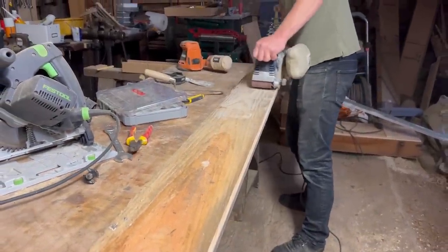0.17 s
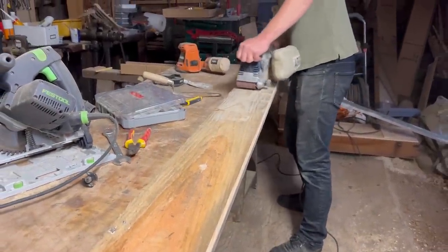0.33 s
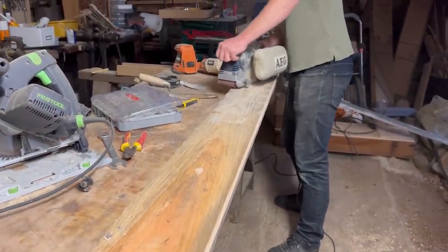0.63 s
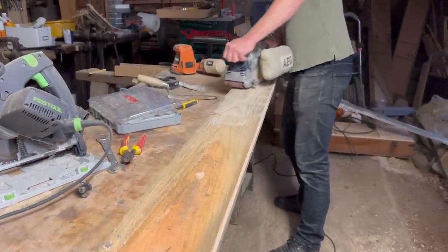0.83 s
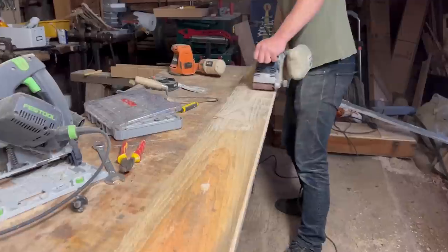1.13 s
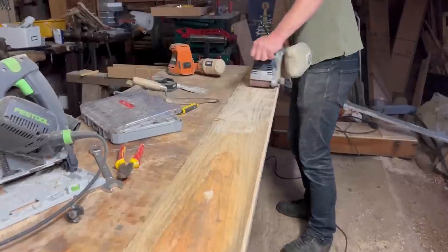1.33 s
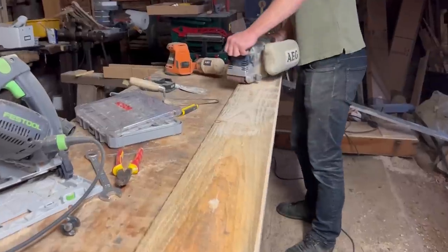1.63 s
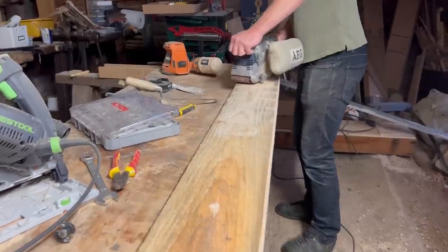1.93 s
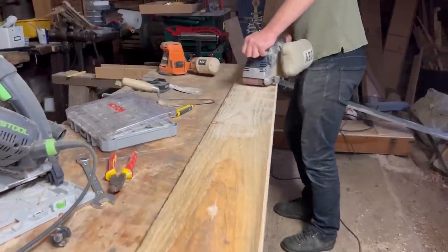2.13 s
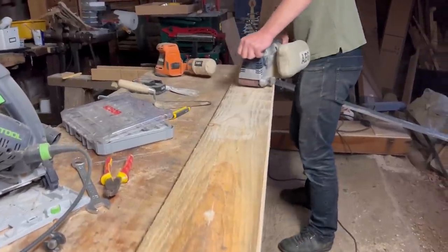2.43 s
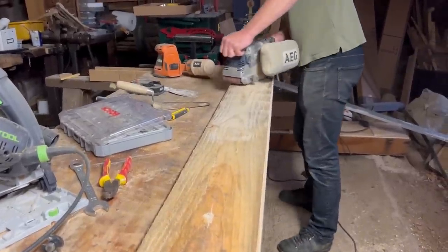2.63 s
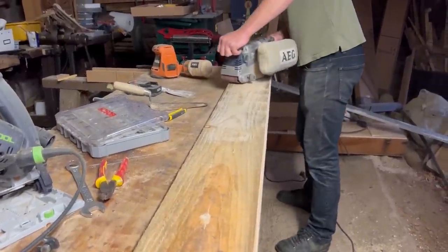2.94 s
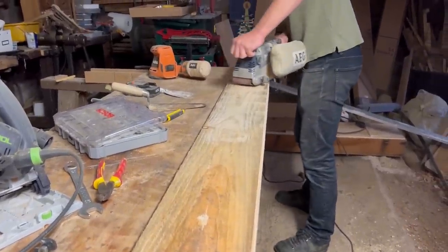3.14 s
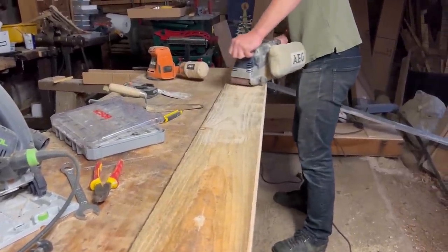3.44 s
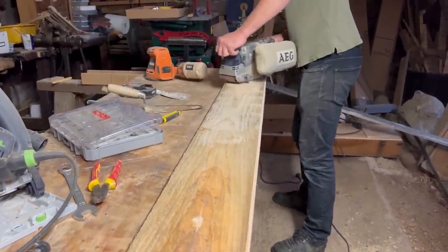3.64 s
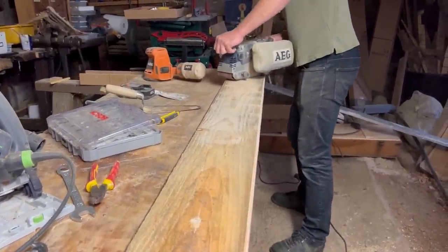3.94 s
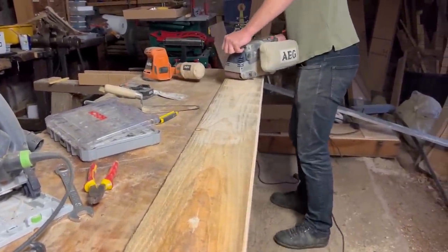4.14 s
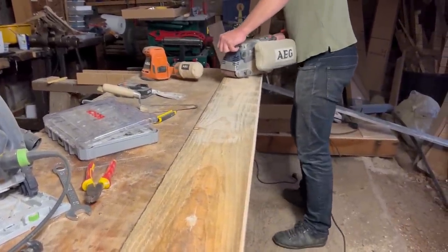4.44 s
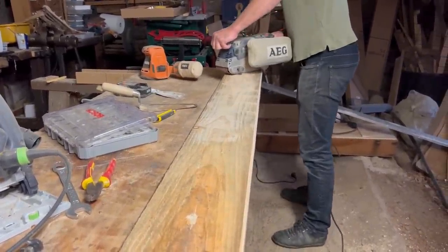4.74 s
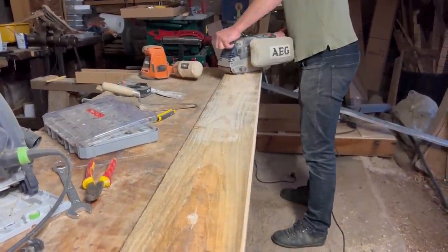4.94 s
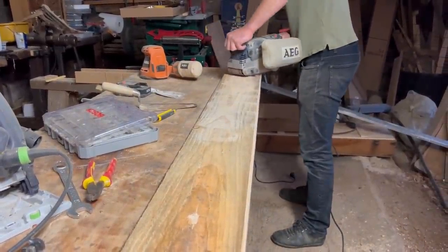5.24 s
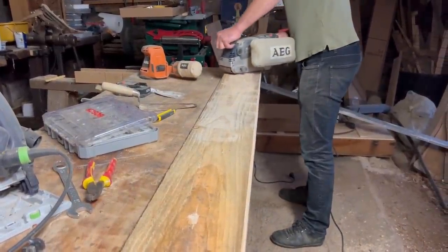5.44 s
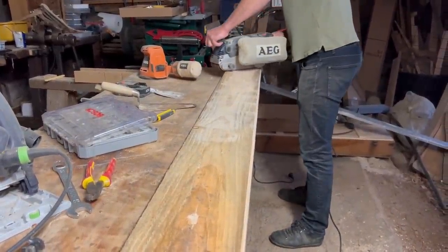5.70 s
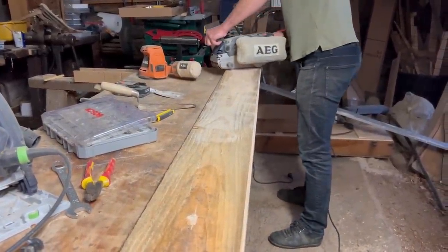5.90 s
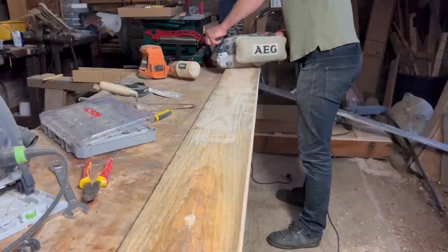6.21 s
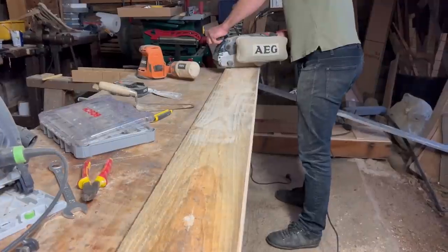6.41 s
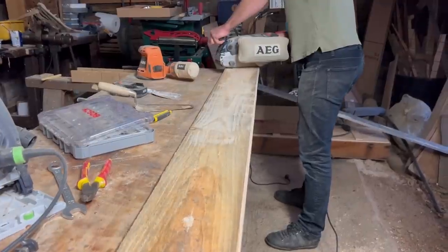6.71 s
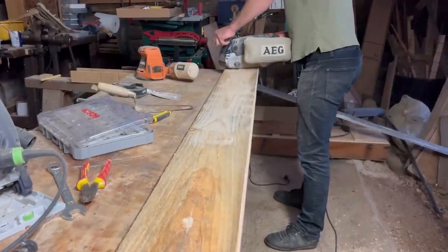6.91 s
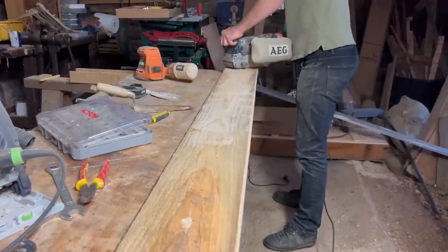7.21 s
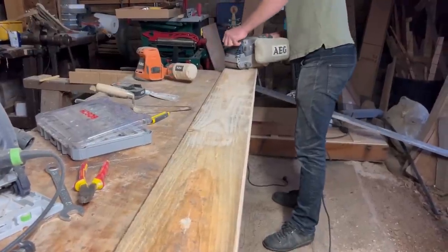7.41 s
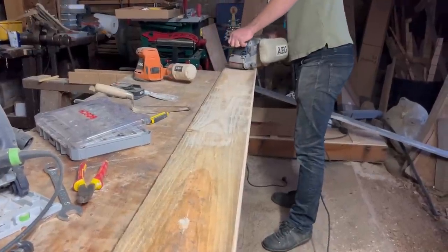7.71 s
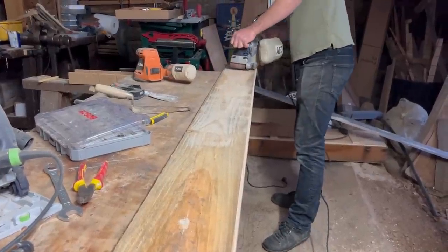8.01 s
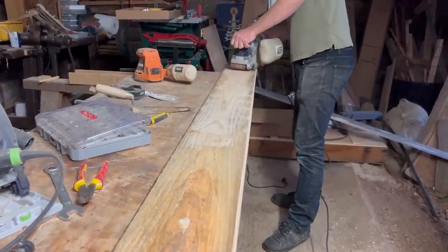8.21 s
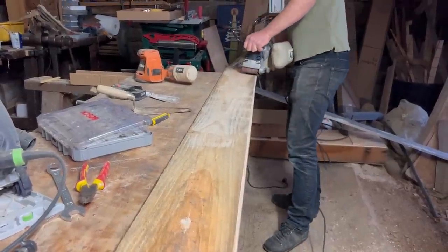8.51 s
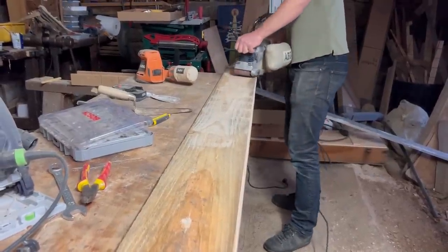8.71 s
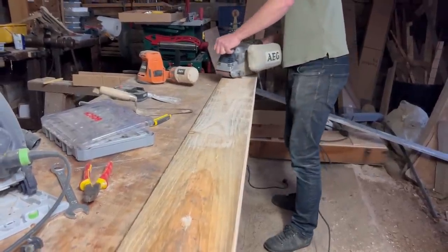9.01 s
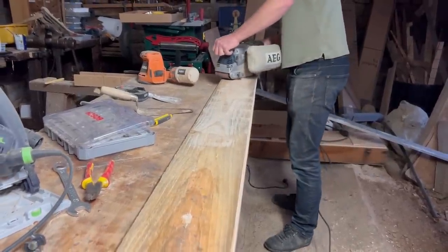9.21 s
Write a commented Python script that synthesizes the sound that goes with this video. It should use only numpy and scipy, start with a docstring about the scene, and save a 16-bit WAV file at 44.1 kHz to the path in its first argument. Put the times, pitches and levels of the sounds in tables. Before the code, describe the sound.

A belt sander whines loudly and steadily over a wooden board, gritty hiss and soft rapid belt thumps beneath, the whine wavering, thinning and returning.

```python
"""A belt sander works to and fro over a long wooden board in a workshop, heard on two microphones for 9.35 s.
It opens with a strong whine on a multiple of the shaft speed, over grit hissing on wood and a soft thump per belt lap.
The whine thins near 2.3 s, returns, thins from 4.2 to 5.5 s, swells around 6 s and nearly goes by 7.5 s;
it climbs in pitch to about 8.6 s, then eases down. All along, echoes cancel it briefly, often on one side only,
while noise bands swell and fade for the hiss, and summed cosines of the lap rate make the board boom."""
import sys
import numpy as np
from scipy import signal
from scipy.fft import rfft, irfft, next_fast_len
from scipy.io import wavfile
from scipy.ndimage import uniform_filter1d

SR = 44100
rng = np.random.default_rng(int(sys.argv[2]) if len(sys.argv) > 2 else 0)


def generate_wav(sig):
    """Save sig (samples, or channels by samples) to the path in sys.argv[1] as 16-bit PCM at SR."""
    pcm = np.round(np.clip(np.atleast_2d(sig).T, -1, 1) * 32767).astype(np.int16)
    wavfile.write(sys.argv[1], SR, pcm)


N = 412335

# Motor speed under load, as the pitch of the main whine before inertia rounds it: start_s, pitch_hz
SPEED = [(0, 1780), (.36, 1755), (.63, 1800), (.84, 1791), (1.0, 1828), (1.17, 1801), (1.42, 1827),
         (1.9, 1799), (2.22, 1864), (2.45, 1860), (2.65, 1830), (3.03, 1808), (3.22, 1846), (3.5, 1826),
         (3.62, 1837), (4.05, 1810), (4.23, 1800), (4.9, 1807), (5.1, 1832), (5.5, 1816), (6.26, 1795),
         (6.6, 1810), (7.2, 1840), (7.32, 1827), (7.55, 1831), (8.09, 1895), (8.35, 1905), (8.62, 1920),
         (8.76, 1913), (9.08, 1861), (9.35, 1886)]
# Slow level of the main whine as the sander travels and turns: start_s, left_db, right_db
WHINE_LEVEL = [(0, -15.5, -17), (.36, -14, -15.5), (.63, -17, -23.5), (.86, -19.5, -21.5),
               (1.19, -18, -11.5), (1.46, -21.5, -18), (1.7, -15.5, -21), (1.97, -17.5, -27),
               (2.2, -30, -25), (2.48, -29, -22.5), (2.72, -18.5, -24), (3.3, -17.5, -20.5),
               (3.9, -19, -27), (4.25, -26.5, -26.5), (4.5, -28.5, -28.5), (4.82, -30, -23),
               (5.05, -25, -28), (5.45, -24.5, -28), (5.62, -18, -17.5), (5.9, -16, -19.5),
               (6.4, -16.5, -17), (6.95, -28.5, -26.5), (7.3, -33, -28), (7.7, -33, -28.5), (8.1, -23, -32),
               (8.45, -26, -29), (8.7, -25.5, -25), (9.05, -22, -22.5), (9.35, -21, -21.5)]
# Echoes cancel or lift the whine, and the sides slip in phase:
# centre_s, left_change_db, right_change_db, half_width_s, left_slip_cycles
DROPOUTS = [(.2, 0.5, 0, 0.14, 0.18), (.99, -6, -0.5, 0.067, -0.025), (1.51, -17, 1, 0.023, 0.082),
            (1.56, -2.5, -25, 0.049, -0.061), (1.8, -0.5, -11, 0.033, -0.071),
            (2.07, -8, -11, 0.042, -0.22), (2.18, -10, 1, 0.015, 0.19), (2.36, -3, -9, 0.031, 0.042),
            (2.592, -17, -11, 0.055, 0.25), (3.15, -11, -11, 0.055, 0.68), (3.612, -6.5, -9, 0.2, 0.27),
            (4.115, -25, -5, 0.031, -.165), (4.62, -4, -5, 0.055, 0.15), (4.95, -16, -1, 0.037, 0.17),
            (5.09, 3.5, -9, 0.059, -0.42), (5.36, -2.5, -17, 0.038, -0.61), (5.7, -11, -3.5, 0.082, -0.31),
            (6.89, 1.5, -5, .05, -.15), (7.04, 0, 5, .05, 0.22), (7.24, -9, -1, 0.048, .75),
            (7.48, 4, 1, .05, .12), (7.63, -4, -1, 0.065, -0.633), (7.92, -0.5, -8, .04, .27),
            (8.36, -1, 2, .07, .45), (8.56, -4, -19, .055, 0), (8.783, -16, -12, 0.039, -0.99),
            (9.152, 0, -14, 0.043, -.1), (9.258, -8, -0.5, .025, 0.17)]
# Other lines of the motor: shaft_multiple, left_over_right_db, left_lead_cycles
OVERTONE_LINES = [(2, -1.5, .1), (12, 9, -.18), (14, 3.5, 0), (18, 13, -.15)]
# Their slow peak levels at the left microphone: start_s, then level_db of each line in that order
OVERTONE_LEVEL = [(0, -46, -38, -42, -33), (.3, -46, -35, -34, -33), (.55, -52, -38, -33, -44),
                  (.8, -50, -38, -34, -36), (1.15, -42, -39, -40, -34), (1.4, -43, -40, -37, -43),
                  (1.75, -51, -40, -37, -32), (2.0, -50, -31, -38, -33), (2.15, -47, -34, -36, -43),
                  (2.4, -45, -36, -35, -35), (2.75, -50, -33, -33, -46), (3.05, -51, -36, -34, -39),
                  (3.3, -49, -33, -33, -45), (3.7, -51, -42, -34, -45), (4.1, -49, -33, -37, -41),
                  (4.45, -52, -35, -36, -30), (4.75, -44, -36, -33, -46), (5.0, -50, -40, -33, -45),
                  (5.4, -49, -31, -33, -47), (5.65, -46, -39, -40, -37), (6.0, -44, -32, -34, -34),
                  (6.25, -44, -28, -35, -31), (6.5, -48, -35, -43, -45), (6.9, -45, -35, -41, -46),
                  (7.35, -47, -44, -36, -46), (7.65, -45, -37, -31, -32), (8.0, -48, -33, -34, -39),
                  (8.3, -56, -28, -32, -42), (8.5, -54, -35, -38, -40), (8.8, -56, -29, -33, -45),
                  (9.1, -45, -37, -31, -36), (9.35, -50, -39, -32, -46)]
# Faint motor lines, mean peak level: shaft_multiple, level_db
FAINT_TONES = [(1.485, -55), (1.555, -55), (5, -50), (7, -50)]

# Mean colour of the hiss before the resonances:
# pitch_hz, left_db_per_hz, right_db_per_hz, likeness_0_to_1, right_lead_cycles
HISS = [(30, -84, -84, .95, 0), (65.4, -84.5, -80, 0.86, -0.013), (134, -67, -70, 0.91, 0.051),
        (210, -73.5, -73.5, 0.97, -0.066), (505, -64.5, -67, 0.9, -0.087), (662, -67, -67.5, 0.72, -0.18),
        (1105, -60.5, -61.5, 0.89, -0.11), (1900, -60.5, -59.5, 0.52, -0.13),
        (2360, -60.5, -61.5, 1, -0.31), (2920, -58, -64.5, 0.37, -0.089), (3540, -60.5, -67.5, 0.3, -0.27),
        (3980, -62, -72, 0.56, 0.036), (4450, -64, -68.5, 0.6, -0.15), (4580, -64, -69.5, 0.67, -0.13),
        (5270, -59.5, -71, 0.45, 0.3), (6650, -61.5, -70, 0.3, 0.26), (7340, -68.5, -70.5, 0.5, 0.056),
        (9150, -72, -72, 0.1, 0.44), (9500, -73, -73, .75, .42), (10200, -74, -74, .92, .5),
        (10800, -74, -74, .8, .56), (11510, -71, -72, 1, 0.74), (13700, -76.5, -74.5, 1, 0.93),
        (16100, -75, -82, .5, 1.4)]
# Resonances of board and housing, added to that colour: centre_hz, width_hz, peak_db
RESONANCES = [(316.6, 24, 6), (462, 29, 5.5), (1310, 150, 1)]
# Sanding strength, of which only the swing about the mean is used:
# start_s, board_low_db, board_upper_db, grit_db
SANDING = [(0.0, -45.5, -33.5, -27.5), (0.34, -46.5, -33.5, -25.5), (0.42, -44, -34, -31.5),
           (1.53, -43.5, -35, -26), (1.66, -40.5, -34.5, -31), (2.39, -43.5, -36, -26),
           (2.86, -40.5, -36.5, -30), (3.28, -39, -35, -25.5), (3.44, -45.5, -37.5, -27.5),
           (3.83, -41, -32, -27.5), (4.37, -42.5, -35.5, -26.5), (5.23, -39.5, -34.5, -28),
           (5.28, -43.5, -38, -29.5), (5.8, -39, -33, -25), (6.72, -40, -34.5, -25.5),
           (7.11, -42.5, -38, -31.5), (7.52, -39.5, -34, -26.5), (9.35, -39, -33, -26)]
# Where one sanding layer hands over to the next: seam_hz
LAYER_SEAMS_HZ = (880, 1900, 3900, 7600)
# Layers from low to high: sanding_column (0 = board_low_db), share_of_swing (ratio)
LAYER_FOLLOWS = [(0, 0.69), (1, 0.7), (2, 0.56), (2, 0.54), (2, 0.3)]
# Grit bites harder or lighter, before each layer takes its share: centre_s, change_db, half_width_s
SCUFFS = [(.3, -1, 0.1), (.95, 2.5, 0.041), (2.1, 1, 0.031), (3.15, 5.5, 0.038), (4.8, 1.5, 0.02),
          (5.15, 2.5, 0.049), (5.75, 1.5, 0.055), (6.801, 2.5, 0.036)]
# One band of the sanding noise swells or fades, before its grain: centre_s, centre_hz, change_db, half_width_s
RASPS = [(.3, 2900, 5.5, .22), (1.25, 2760, 3.5, 0.45), (2.2, 2760, 4, 0.17), (3.75, 315.6, 4.5, 0.33),
         (3.9, 470, -4, 1.59), (4.05, 2800, 4, 0.034), (6.1, 1409, 4, 0.87), (7.0, 199, -9, 1.61),
         (8.4, 2773, 3, 0.075), (8.72, 2690, 3, 0.14)]

# The board booms as the sander crosses a free stretch: centre_s, half_width_s, low_db, middle_db, high_db
BOOMS = [(0, 0.26, -58, -46.5, -53), (.65, 0.26, -56, -49, -52), (1.27, 0.25, -51, -49.5, -49.5),
         (1.8, 0.19, -66, -51, -58), (2.34, 0.16, -42, -50, -47.5), (2.78, .15, -64, -51, -52.5),
         (3.33, 0.22, -44, -58, -44.5), (4.0, 0.21, -56, -65, -51), (4.8, 0.64, -47, -54, -79),
         (5.25, 0.17, -45, -64, -47.5), (5.7, 0.28, -52, -55, -72), (6.2, 0.26, -50, -60, -69),
         (7.198, 0.77, -48.5, -59, -54), (8.6, 0.26, -55, -49, -49.5), (9.0, 0.54, -50, -51, -71)]
# Thump lines carried by those booms: lap_multiple, boom_column (0 = low_db), added_db
BOOM_LINES = [(8, 0, -25), (9, 0, -1.5), (10, 1, -4.5), (11, 1, 0.5), (12, 1, -6), (13, 2, -14), (14, 2, 2),
              (15, 2, -4)]
# Thump lines outside the booms, mean level: lap_multiple, level_db
FAINT_THUMP = [(7, -65.5), (16, -71), (19, -68), (20, -61.5)]

MAIN_MULTIPLE = 6   # the main whine, in multiples of the shaft speed
INERTIA_S = 0.079   # the rotor rounds off changes of speed
LEAD_START = -.1   # cycles by which the left whine leads before any slip
ECHO_SHARE = .24   # scattered part of each weak line, as a ratio
RASP_OCTAVES, RASP_GRAIN_DB = .22, 0.39   # half width in octaves; unevenness per dB of swell
LAPS_PER_TURN = .03676   # belt laps per turn of the shaft
JOINT_START = 0.0803   # share of a lap already run
THUMP_WANDER_DB = 3   # spread of the faint thump lines
CUTOFF_HZ = 15720


def amp(db):
    """Gain of a level in dB."""
    return 10 ** (np.asarray(db) / 20)


def rms_one(x):
    """Scaled to rms 1."""
    return x / np.sqrt(np.mean(x ** 2) + 1e-20)


def in_time(rows):
    """Columns of a curve table, with time first, at every sample."""
    s, *columns = np.transpose(rows)
    return [np.interp(np.arange(N) / SR, s, c) for c in columns]


def drift(corner_hz):
    """Slow chance of spread 1: coarse noise twice through a one-pole low-pass."""
    r = np.exp(-80 * np.pi * corner_hz / SR)   # one draw per 40 samples
    noise = rng.standard_normal(N // 40 + 2002)
    slow = signal.lfilter([1], [1, -2 * r, r * r], noise)[2000:]   # the filter has settled
    return np.interp(np.arange(N) / 40, np.arange(len(slow)), rms_one(slow))


def sides(pan_db):
    """Left and right gain for a left-over-right difference."""
    return np.array([amp(pan_db / 2), amp(-pan_db / 2)])


def motor(turns):
    """Motor lines are sines locked to the shaft, swelling and fading at each microphone as echoes add or cancel."""
    t = np.arange(N) / SR
    torque_ripple = 0.0017 * np.sin(2 * np.pi * 100 * t)   # in turns, at twice the mains
    turns = turns + 0.00061 * drift(40) + torque_ripple
    return main_whine(turns) + weak_lines(turns)


def main_whine(turns):
    """The strongest line: both microphones share its waver, but echoes dip each side and slip its phase."""
    t = np.arange(N) / SR
    left_db, right_db = in_time(WHINE_LEVEL)
    lead = LEAD_START
    for s, left_dip_db, right_dip_db, width, slip in DROPOUTS:
        away = (t - s) / width
        depth = 1 / (1 + np.abs(away) ** 3)   # steep edges
        left_db = left_db + left_dip_db * depth
        right_db = right_db + right_dip_db * depth
        lead = lead + slip * (1 + np.tanh(away)) / 2   # the slip stays
    waver = np.sqrt(2) * amp(0.97 * drift(21))   # root 2: levels are rms
    left = amp(left_db) * np.sin(2 * np.pi * (MAIN_MULTIPLE * turns + lead / 2))
    right = amp(right_db) * np.sin(2 * np.pi * (MAIN_MULTIPLE * turns - lead / 2))
    return waver * np.array([left, right])


def weak_lines(turns):
    """Other shaft multiples: scattered echoes add or cancel, and each microphone hears its own waver."""
    lines = []
    for (k, pan_db, ahead), left_db in zip(OVERTONE_LINES, in_time(OVERTONE_LEVEL)):
        lines.append((round(k), pan_db, ahead, left_db - pan_db / 2))
    for k, db in FAINT_TONES:
        lines.append((k, 0, 0, db + 3 * drift(1.5)))
    out = np.zeros((2, N))
    for k, pan_db, ahead, db in lines:
        blur = rng.random() + .1 * drift(2.5) + .0003 * k * k * drift(15)   # cycles; high lines blur most
        scatter = 1 + ECHO_SHARE * (drift(8) + 1j * drift(8))   # direct sound plus echoes
        blur = blur + np.angle(scatter) / (2 * np.pi)
        db = db + 20 * np.log10(np.abs(scatter) + 1e-3)
        for side, gain in enumerate(sides(pan_db)):
            echo_shift = blur - side * ahead + .06 * drift(2.5)
            level = gain * amp(db + 1.2 * drift(8))
            out[side] += level * np.sin(2 * np.pi * (k * turns + echo_shift))
    return out


def hiss_spectrum(hz, size):
    """Steady grit noise, partly shared by both microphones, coloured by the board and housing."""
    at, *columns = np.transpose(HISS)
    left_db, right_db, alike, lead = [np.interp(np.log(hz), np.log(at), c) for c in columns]
    alike = np.clip(alike, 0, 1)
    peaks_db = sum(db / (1 + (2 * (hz - centre_hz) / width) ** 2) for centre_hz, width, db in RESONANCES)
    first, second = rfft(rng.standard_normal((2, size)))
    shared = alike * np.exp(2j * np.pi * lead) * first
    right = shared + np.sqrt(1 - alike ** 2) * second
    coloured = np.array([amp(left_db) * first, amp(right_db) * right])
    return coloured * amp(peaks_db) * np.sqrt(SR / 2)   # from level per Hz to noise of rms 1


def hiss(laps):
    """Grit on wood: noise in quarter-octave bands that flicker with the bite of the grit."""
    t = np.arange(N) / SR
    size = next_fast_len(N)
    hz = np.maximum(np.arange(size // 2 + 1) * SR / size, 1)
    spectrum = hiss_spectrum(hz, size)

    swings_db = [c - c.mean() for c in in_time(SANDING)]
    layers_db = [share * swings_db[round(column)] for column, share in LAYER_FOLLOWS]
    scuff_db = sum(db * np.exp(-((t - s) / width) ** 4) for s, db, width in SCUFFS)
    scuff_shares = (.1, 0.29, 0.87, 1.2, 0.077)   # low to high layer
    patchy_db = (1.0, 0.97, 0.81, 0.74, 0.091)
    shared_db = 0.24 * drift(9.0) + 0.47 * drift(15.4)
    shared_db = shared_db + .45 * np.cos(2 * np.pi * (laps - .3))   # the belt cuts unevenly round its lap

    grain = 1 + RASP_GRAIN_DB * drift(28)
    rasps = []
    for s, centre_hz, db, width in RASPS:
        rasps.append((centre_hz, db * grain * np.exp(-((t - s) / width) ** 4)))

    out = np.zeros((2, N))
    step = 4 * np.log2(hz / 30)   # quarter octaves above 30 Hz
    for k in range(38):
        band_hz = 30 * 2 ** (k / 4)
        mask = np.cos(np.pi / 2 * np.clip(step - k, -1, 1)) ** 2   # neighbours overlap and sum to one
        layer = np.searchsorted(LAYER_SEAMS_HZ, band_hz)
        level_db = layers_db[layer] + scuff_shares[layer] * scuff_db + shared_db
        for centre_hz, rasp_db in rasps:
            near = np.exp(-(np.log2(band_hz / centre_hz) / RASP_OCTAVES) ** 2)
            if near > .01:
                level_db = level_db + near * rasp_db
        patch_db = patchy_db[layer] * drift(1.0) + 1.0 * drift(14.0)   # colour shifts as the sander moves
        band = irfft(spectrum * mask, size)[:, :N]
        out += band * amp(level_db + patch_db) * sides(0.18 * drift(5.2))
    return out


def thumps(laps):
    """The belt joint's soft blow: lap-rate multiples crest together, each answered by the board in its own measure."""
    t = np.arange(N) / SR
    booms = sum(amp(dbs)[:, None] * np.exp(-((t - s) / width) ** 2) for s, width, *dbs in BOOMS)
    lines = [(round(k), amp(db) * booms[round(column)]) for k, column, db in BOOM_LINES]
    lines += [(round(k), amp(db + THUMP_WANDER_DB * drift(1.2))) for k, db in FAINT_THUMP]
    out = np.zeros(N)
    for k, gain in lines:
        waver = amp(1.0 * drift(5.9))
        out += gain * waver * np.cos(2 * np.pi * (k * laps + 0.03 * drift(0.88)))
    return np.sqrt(2) * out   # levels are rms; the same at both microphones


def scene():
    """Motor, grit and belt joint, all driven by one shaft."""
    whine_hz, = in_time(SPEED)
    shaft_hz = uniform_filter1d(whine_hz, int(INERTIA_S * SR), mode="nearest") / MAIN_MULTIPLE
    turns = np.cumsum(shaft_hz) / SR
    laps = LAPS_PER_TURN * turns + JOINT_START
    return motor(turns) + hiss(laps) + thumps(laps)


def record(dry):
    """A steep elliptic low-pass cuts the top at both microphones."""
    return signal.sosfilt(signal.ellip(12, .5, 62, CUTOFF_HZ, fs=SR, output="sos"), dry)


dry = scene()
out = record(dry)
generate_wav(out)
```